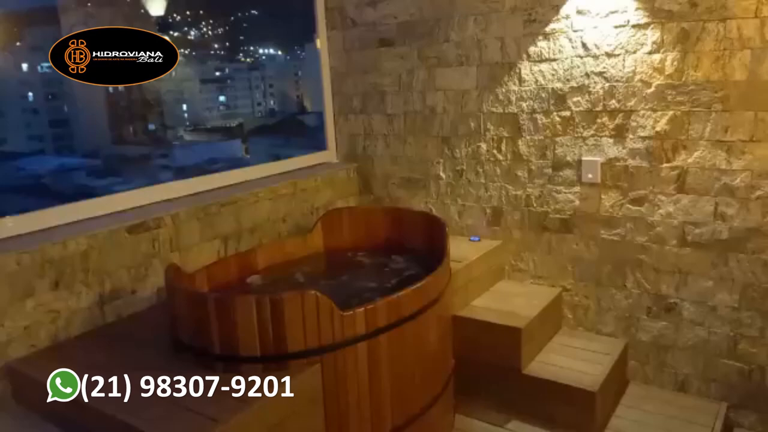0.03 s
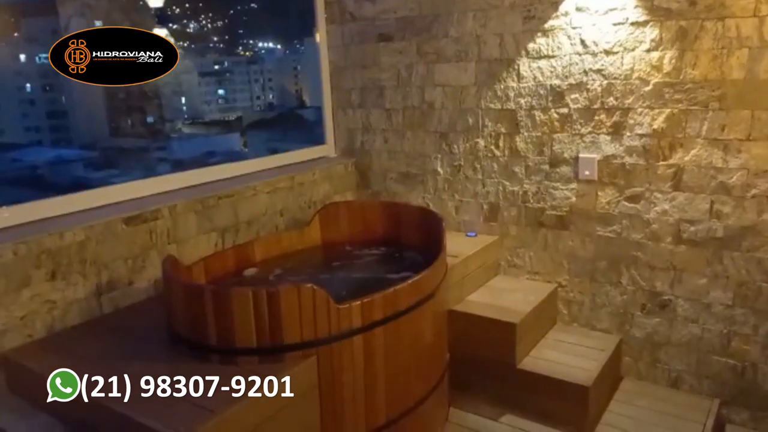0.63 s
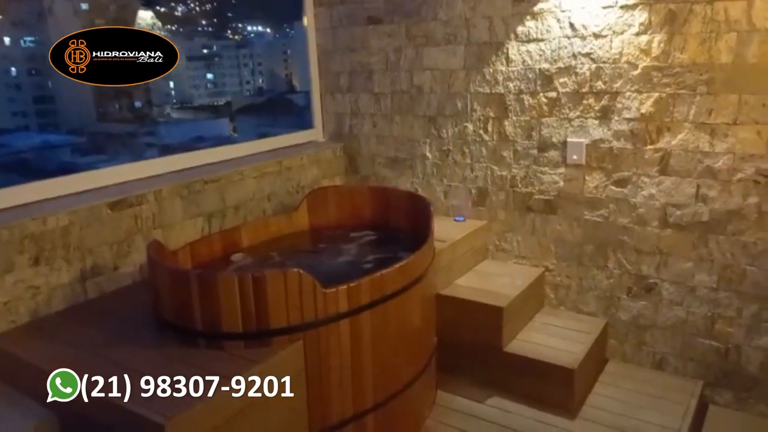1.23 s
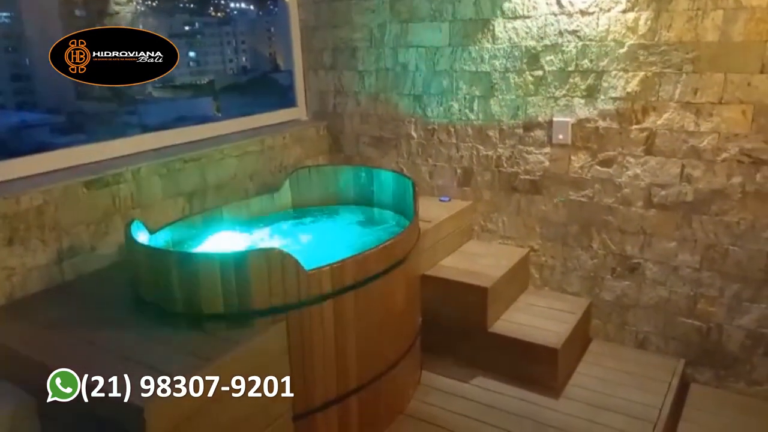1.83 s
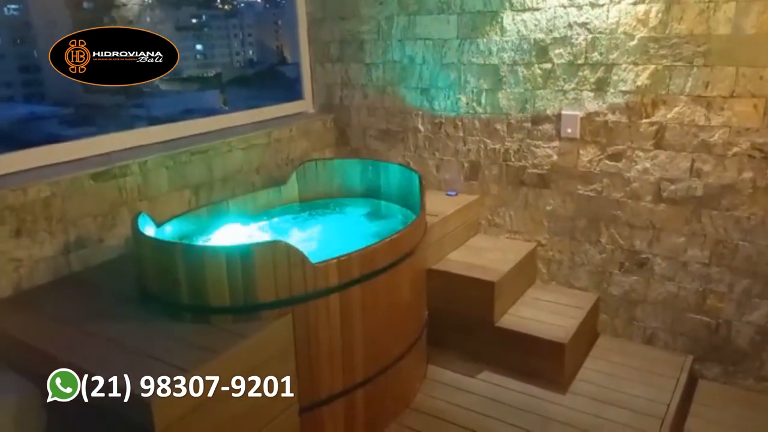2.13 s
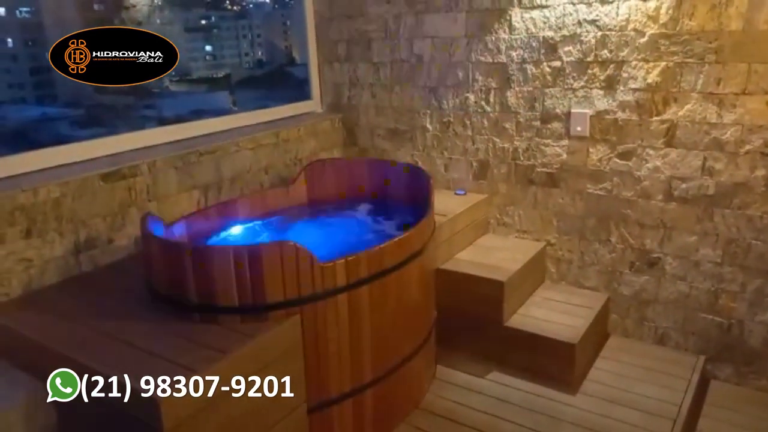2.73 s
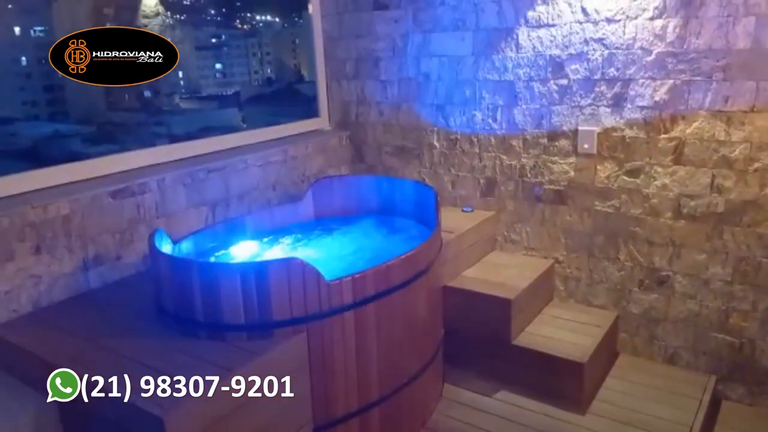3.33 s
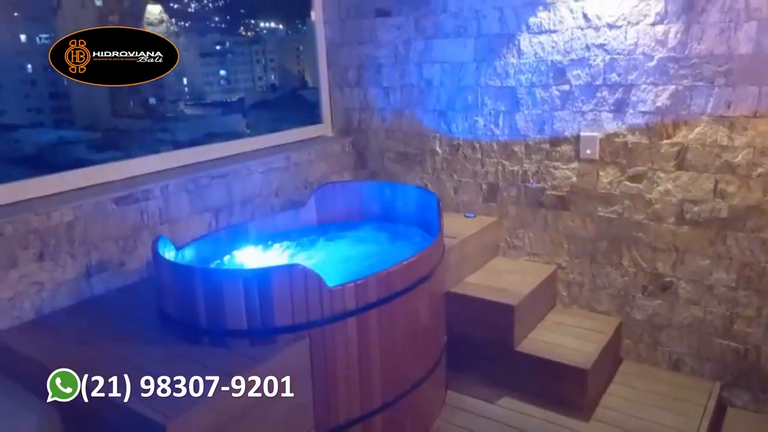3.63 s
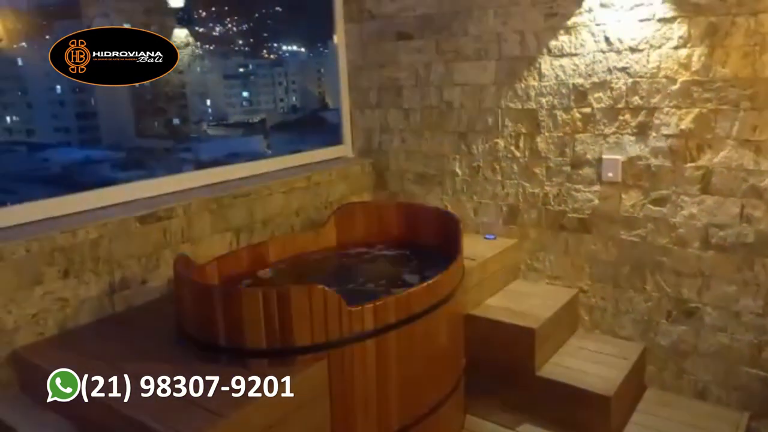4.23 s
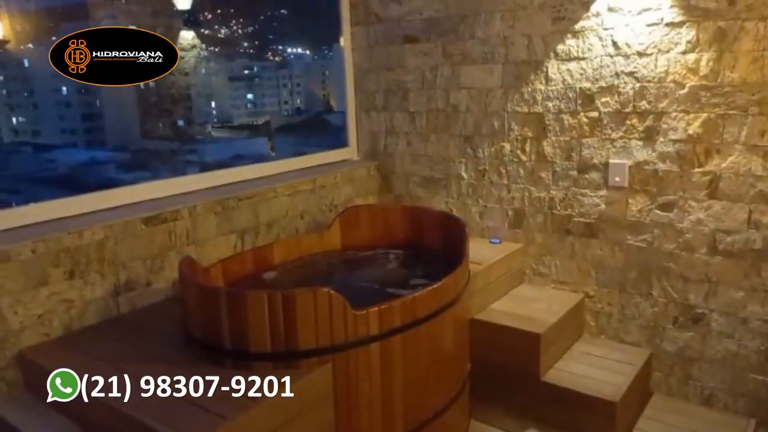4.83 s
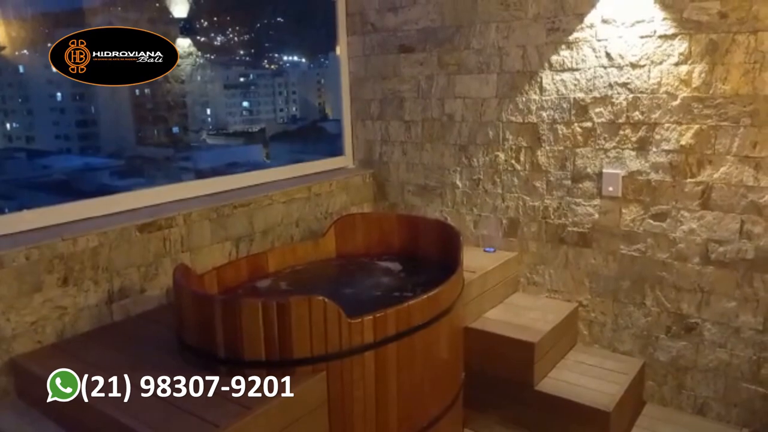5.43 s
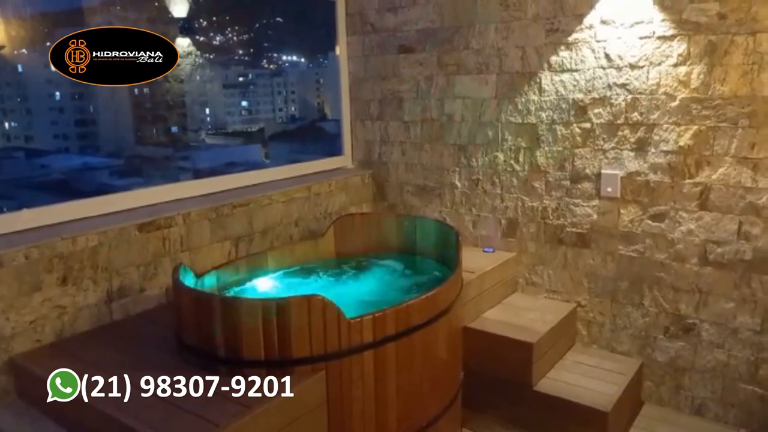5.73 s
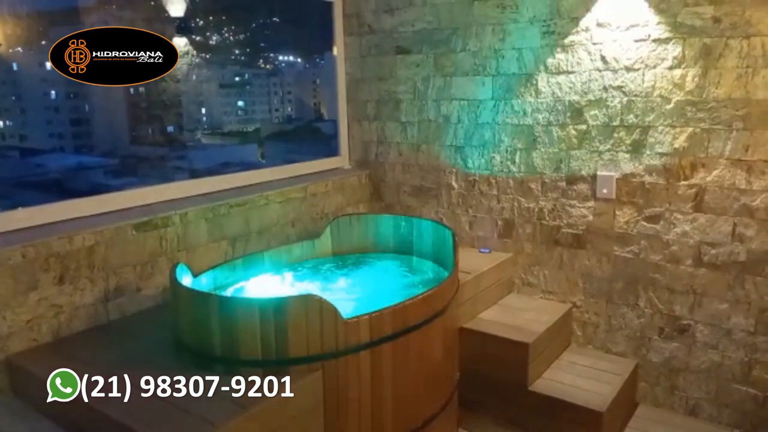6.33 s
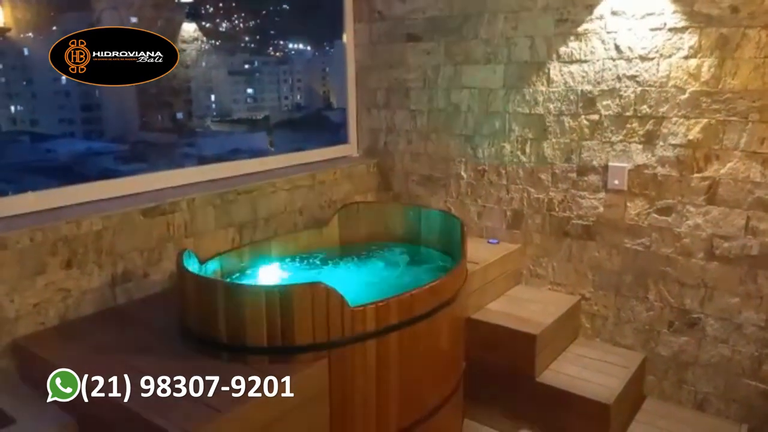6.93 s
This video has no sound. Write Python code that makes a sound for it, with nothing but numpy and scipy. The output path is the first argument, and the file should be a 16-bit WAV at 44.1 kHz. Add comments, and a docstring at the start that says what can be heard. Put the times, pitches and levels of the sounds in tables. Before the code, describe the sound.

A wooden hot tub bubbles continuously on a terrace, a mix of gurgling, fine splashing and fizzy hiss. A low wind thump hits the microphone at the start, then a louder run of buffets follows about a second in. The water softens briefly and comes back, while the wind eases to a light rumble with occasional bumps. The pump hums faintly underneath and the nozzles give a faint, wavering whistle.

```python
"""Stone-walled terrace, wooden hot tub. Jets churn the water: big bubbles gurgle, drops splash and
bursting foam fizzes, all dipping in level after the first second and recovering. Air drawn into the
nozzles rushes and whistles, the pump hums faintly and the hollow of the tub rings. A light draught
and puffs of wind buffet the two microphone ports, hardest around the first second."""
import sys
import numpy as np
from scipy import signal
from scipy.fft import rfft, irfft, next_fast_len
from scipy.io import wavfile
from scipy.ndimage import uniform_filter1d, map_coordinates

SR = 44100
rng = np.random.default_rng(int(sys.argv[2]) if len(sys.argv) > 2 else 0)


def persist_wave(psi):
    """Save psi, clipped to +-1, as 16-bit WAV."""
    counts = np.round(np.clip(psi, -1, 1) * 32767).astype(np.int16)
    wavfile.write(sys.argv[1], SR, np.atleast_2d(counts).T)


N = 307818
TIME_S = np.arange(N) / SR


def amp(db):
    """Decibels to gain."""
    return 10 ** (np.asarray(db) / 20)


def unit(x):
    """Scale to rms 1."""
    return x / np.sqrt(np.mean(x ** 2) + 1e-20)


def pan(pan_db):
    """Port gains for a left-minus-right level."""
    return amp(np.array([[.5], [-.5]]) * pan_db)


def at_freq(points, hz):
    """Interpolate (freq_hz, value) rows on a log axis."""
    freq_hz, values = np.transpose(points)
    return np.interp(np.log(hz + 1), np.log(freq_hz + 1), values)


def over_time(points):
    """Interpolate (time_s, value) rows per sample."""
    return np.interp(TIME_S, *np.transpose(points))


def wobble(rate_hz):
    """Smooth random curve with knots at rate_hz."""
    knots = rng.standard_normal(int(N * rate_hz / SR) + 4)
    return map_coordinates(knots, [TIME_S * rate_hz])


def filtered(x, response):
    """Apply a gain given as a function of frequency."""
    size = next_fast_len(N + SR // 2)
    return irfft(rfft(x, size) * response(np.fft.rfftfreq(size, 1 / SR)), size)[..., :N]


def resonance(hz, centre_hz, width_hz):
    """Bell curve of height 1."""
    return 1 / (1 + (2 * (hz - centre_hz) / width_hz) ** 2)


def narrow_hiss(centre_hz, width_hz, shared):
    """Noise through one resonance, partly common to both ports."""
    noise = rng.standard_normal((2, N)) + shared * rng.standard_normal(N)
    return unit(filtered(noise, lambda hz: resonance(hz, centre_hz, width_hz)))


def turbulence(spectrum, shared):
    """Coloured noise of even strength, partly common to both ports."""
    white = rng.standard_normal((2, N)) + shared * rng.standard_normal(N)
    noise = unit(filtered(white, lambda hz: amp(at_freq(spectrum, hz))))
    power = uniform_filter1d(uniform_filter1d(noise ** 2, size=900), size=900)
    return noise / np.sqrt(np.abs(power) + 0.021)


def bubbles(per_s, lo_hz, hi_hz, cycles, spread_db, samples):
    """Random bubbles: damped sines rising in pitch, a few much louder than the rest."""
    when, pitch, loud, life = rng.random((int(per_s * N / SR), 4)).T[:, :, None]
    pitch_hz = lo_hz * (hi_hz / lo_hz) ** pitch
    turns = pitch_hz * np.arange(samples) / SR
    age = turns / (cycles * (.5 + life))
    strength = amp(-spread_db * np.log(1 - .985 * loud)) * pitch_hz
    rise = 1 + 0.027 * np.minimum(age, 5)
    ring = strength * np.exp(-age) * np.sin(2 * np.pi * turns * rise)
    index = (when * N).astype(int) + np.arange(samples)
    return unit(np.bincount(index.ravel(), ring.ravel(), N + samples)[:N])


def terrace(x, t60_s, wet_db):
    """Direct sound plus a diffuse wash of reflections, renewed often so that no pitch rings out."""
    hop = SR // 6
    tail_s = np.arange(SR // 4) / SR
    frames = np.lib.stride_tricks.sliding_window_view(np.pad(x, (hop, 2 * hop)), 2 * hop)[::hop]
    frames = frames * np.hanning(2 * hop) ** .5
    responses = rng.standard_normal((len(frames), 2, len(tail_s))) * amp(-60 * tail_s / t60_s)
    responses *= amp(wet_db) / np.linalg.norm(responses, axis=2, keepdims=True)
    responses[:, 0, 6] += 1
    responses[:, 1, 0] += 1  # direct sound reaches the right port first
    out = np.zeros((2, N + SR))
    for k, echo in enumerate(signal.fftconvolve(frames[:, None], responses, axes=2)):
        out[:, k * hop:][:, :echo.shape[1]] += echo
    return unit(out[:, hop:hop + N])


def near_walls(x, echo_db):
    """Direct sound plus eight weak echoes per port from the nearest walls."""
    delays_s = rng.uniform(.002, .03, (2, 8))
    taps = np.zeros((2, SR // 30))
    taps[:, 0] = 1
    taps[[[0], [1]], (delays_s * SR).astype(int)] = amp(echo_db)
    return unit(signal.fftconvolve(x, taps, axes=1)[:, :N])


# Modes of the tub and fittings: centre_hz, width_hz, boost_db
TUB_MODES = [(365.3, 31, 6), (462, 45, 2), (742, 19, 3), (890, 26, 2.5), (1770, 55, -1), (2025, 260, 5),
             (2460, 60, 0.5), (2864, 50, 4), (3280, 59, 3), (3460, 130, 5), (4290, 90, 4.5),
             (4570, 124, 4.5), (4840, 120, 3), (11600, 80, 4), (12200, 120, 2.5), (12400, 80, 3)]
# Left-right likeness of the water: freq_hz, correlation
WATER_CORRELATION = [(100, 1), (300, 0.76), (700, 0.3), (1250, -0.51), (2000, 0.18), (5500, -0.088),
                     (15000, -0.071)]

def water_layer(grains, spectrum, wash_db, surge_db):
    """Bubbles over a wash of countless smaller ones, coloured by the tub; bass alike at both ports."""
    def mid_side_gains(hz):
        modes_db = sum(db * resonance(hz, centre_hz, width_hz) for centre_hz, width_hz, db in TUB_MODES)
        angle = np.arccos(np.clip(at_freq(WATER_CORRELATION, hz), -1, 1)) / 2
        return amp(at_freq(spectrum, hz) + modes_db) * [np.cos(angle), np.sin(angle)]

    left, right = grains + amp(wash_db) * rng.standard_normal((2, N))
    mid, side = filtered(np.array([left + right, left - right]), mid_side_gains)
    return unit(np.array([mid + side, mid - side]) * amp(surge_db))


# Loudness of the water, dips after the big gust, then recovers: time_s, level_db
WATER_LEVEL = [(0.15, -48), (0.6, -48), (0.92, -46.5), (1.03, -49), (1.22, -55), (1.99, -54.5),
               (2.27, -57.5), (2.8, -52), (3.6, -50), (3.95, -51), (5.05, -49.5), (6.95, -51)]

def follow_water(usual_db, db_per_db):
    """Gain of a layer that follows the water's loudness; usual_db at a water level of -50.5 dB."""
    return amp(usual_db + db_per_db * (over_time(WATER_LEVEL) + 50.5))


# Big-bubble spectrum: freq_hz, level_db
GURGLE_SPECTRUM = [(70, -18), (170, -10), (250, -2), (340, -3), (430, -4.5), (540, -7.5), (650, -3),
                   (760, -10.5), (920, -6.5), (1060, -8.5), (1250, -17.5), (2200, -24)]
# Big-bubble envelope: time_s, level_db
GURGLE_LEVEL = [(0.15, -43), (0.9, -43.5), (1.4, -48), (2.25, -50.5), (2.9, -44.5), (3.6, -45), (4.3, -46),
                (4.85, -44.5), (5.0, -42), (5.2, -45), (5.45, -45), (5.68, -42), (6.05, -45.5),
                (6.95, -44.5)]

def gurgle(heave):
    """Big bubbles from the jets ring low."""
    big = bubbles(per_s=800, lo_hz=201.3, hi_hz=1285, cycles=3.37, spread_db=2.5, samples=1200)
    big = terrace(big, t60_s=0.15, wet_db=1)
    surge_db = 0.31 * heave + 0.18 * wobble(55)
    return amp(over_time(GURGLE_LEVEL)) * water_layer(big, GURGLE_SPECTRUM, wash_db=8, surge_db=surge_db)


# Falling-drop spectrum: freq_hz, level_db
SPLASH_SPECTRUM = [(600, -21.5), (1050, 0), (1350, -4), (1700, -2.5), (2100, -4), (2600, -4), (3200, -9),
                   (3750, -10.5), (4100, -7.5), (4750, -8.5), (5400, -11), (8000, -18)]

def splash(heave):
    """Drops fall back onto the heaving surface."""
    drops = bubbles(per_s=1800, lo_hz=1096, hi_hz=5680, cycles=2.97, spread_db=3.5, samples=400)
    drops = terrace(drops, t60_s=0.12, wet_db=6.5)
    water = water_layer(drops, SPLASH_SPECTRUM, wash_db=3.5, surge_db=0.56 * heave + 0.84 * wobble(50))
    return follow_water(usual_db=-47.5, db_per_db=0.9) * near_walls(water, echo_db=-21.5)


# Bursting-foam spectrum: freq_hz, level_db
FIZZ_SPECTRUM = [(3000, -29), (5400, -10), (7000, -2.5), (8400, -5), (9400, 1), (10600, 1), (11400, 0.5),
                 (12600, 0.5), (14000, -2), (15700, -1.5)]

def fizz(heave):
    """Tiny foam bubbles burst in spurts."""
    foam = bubbles(per_s=1500, lo_hz=4350, hi_hz=16050, cycles=2.6, spread_db=4, samples=100)
    foam = terrace(foam, t60_s=0.067, wet_db=18)
    spurts_db = .4 * wobble(7) + .5 * wobble(25) + .45 * wobble(70)
    water = water_layer(foam, FIZZ_SPECTRUM, wash_db=3, surge_db=0.12 * heave + spurts_db)
    return follow_water(usual_db=-49, db_per_db=0.98) * near_walls(water, echo_db=-23) * pan(0.8)


# Nozzle whistle bands: centre_hz, width_hz, relative_db
WHISTLE_BANDS = [(9890, 100, -4), (10090, 250, -3), (11470, 220, -9.5), (11300, 110, -15)]
# Whistle envelope: time_s, level_db
WHISTLE_LEVEL = [(0.1, -63), (1.2, -61.5), (1.55, -59.5), (1.95, -61), (2.3, -65), (2.9, -61.5), (3.6, -60),
                 (4.6, -62.3), (6.95, -61.5)]
# Thin tones in the air rush: centre_hz, width_hz, relative_db
RUSH_TONES = [(1012, 13, -5), (1702, 14, -5.5), (2024, 75, -10), (2410, 14, -10.5)]

def nozzles():
    """Air drawn into the jets: a wavering whistle, an even sizzle and, when loudest, a singing rush."""
    whistle = sum(amp(db + 1.8 * wobble(9)) * narrow_hiss(hz, width_hz, shared=1.1)
                  for hz, width_hz, db in WHISTLE_BANDS)
    whistle_db = over_time(WHISTLE_LEVEL) + 1.4 * wobble(13)
    rush = amp(1.5 * wobble(6.7)) * narrow_hiss(centre_hz=1757, width_hz=190, shared=0.53)
    tones = sum(amp(db) * narrow_hiss(hz, width_hz, shared=0.32) for hz, width_hz, db in RUSH_TONES)
    sizzle = narrow_hiss(centre_hz=4044, width_hz=140, shared=1)
    return (amp(whistle_db) * whistle
            + follow_water(usual_db=-60.5, db_per_db=1.95) * (rush + tones)
            + follow_water(usual_db=-64, db_per_db=1) * sizzle)


# Mains and impeller tones: pitch_hz, level_db
PUMP_TONES = [(120, -63), (685, -68), (1027, -67), (1146, -81)]

def pump():
    """Mains hum and impeller tones, unsteady as air passes through the pump."""
    clock_s = np.cumsum(1 + .003 * wobble(25)) / SR
    out = np.zeros((2, N))
    for pitch_hz, level_db in PUMP_TONES:
        peak = np.sqrt(2) * amp(level_db + 3.6 * wobble(22))
        port_turns = 0.22 * rng.random((2, 1))
        out += peak * np.sin(2 * np.pi * (pitch_hz * clock_s + port_turns))
    return out


# Draught envelope: time_s, level_db
DRAUGHT_LEVEL = [(0.1, -34), (0.4, -41), (0.55, -45.5), (0.9, -37), (1.6, -39.5), (1.76, -41.5), (2.0, -45),
                 (2.15, -56), (2.43, -56.5), (2.6, -45.5), (2.95, -43), (3.45, -51), (3.68, -44),
                 (3.85, -52), (4.24, -48), (4.37, -57), (4.6, -49.5), (5.25, -50), (5.8, -44.5), (6.3, -50),
                 (6.46, -55), (6.78, -43.5), (6.95, -61)]
# Draught spectrum: freq_hz, level_db
DRAUGHT_SPECTRUM = [(15, -33), (35, -19), (58, -0.5), (85, 2), (125, -6), (170, -15.5), (300, -17),
                    (600, -63)]

def draught():
    """A light draught rumbles on each port in random lumps."""
    lumps_db = 5.5 * np.minimum([wobble(20), wobble(20)], 1)
    return amp(over_time(DRAUGHT_LEVEL) + lumps_db) * pan(-2) * turbulence(DRAUGHT_SPECTRUM, shared=0.76)


# Wind puffs: centre_s, half_length_s, strength_db, pan_db, extra_eddies_db
PUFFS = [(0.082, 0.014, -27.5, -10, 4.5), (0.103, 0.014, -31, 14, 7), (0.2, 0.026, -36.5, -11, -11),
         (0.375, .014, -42, -2, -4), (0.685, 0.012, -38.5, 18, 1), (0.787, 0.019, -28, -18, 0.5),
         (0.832, 0.019, -32.5, -22, -5), (0.934, 0.032, -25, -21.5, -6.5),
         (0.998, 0.017, -16.5, -10.5, 0.5), (1.04, .014, -20, -17, 1.5), (1.09, 0.022, -21, -4.5, 3.5),
         (1.136, 0.019, -18, -9.5, -1), (1.195, 0.018, -18.5, -0.5, 2), (1.305, 0.016, -19, -1.5, 3),
         (1.348, 0.0094, -29, 7.5, 4), (1.43, 0.02, -20.5, 2, -2), (1.523, 0.0093, -26, -4, 3),
         (1.577, 0.029, -25.5, 0.5, 2), (1.627, 0.0093, -24.5, -2, 1.5), (1.653, 0.014, -26.5, -2, 2),
         (1.703, 0.0096, -27.5, -1.5, 11.5), (1.869, 0.013, -24.5, 4.5, -5), (1.924, 0.0075, -39, -5, -3),
         (2.33, 0.013, -39, 1, 6), (2.877, 0.01, -42, 11, -1), (2.935, 0.0061, -32, -5, 0),
         (2.972, 0.011, -30.5, -6.5, 0), (3.048, 0.018, -40, 17.5, 4), (3.981, 0.024, -32.5, -7, 6),
         (4.072, 0.015, -34, -10, -14), (4.265, 0.014, -40, -4, -10), (4.602, 0.011, -28, 3, -12),
         (4.649, 0.0083, -32, 0, 2), (4.71, 0.018, -44, 19, 3), (4.96, 0.016, -42.5, -15, 0),
         (5.035, 0.011, -38.5, 5, 2), (5.144, 0.027, -36.5, 1, -6), (5.72, 0.012, -34, -7, -6),
         (5.782, 0.015, -34, -4, 0), (6.792, 0.025, -39.5, 0, 3)]
# Puff thud spectrum: freq_hz, level_db
THUD_SPECTRUM = [(15, -50), (40, -11), (70, 5.5), (100, 6.5), (155, -6), (220, -16.5), (400, -33),
                 (900, -79)]
# Small-eddy spectrum: freq_hz, level_db
EDDY_SPECTRUM = [(60, -5.5), (140, 3.5), (220, -1), (330, -8.5), (450, -17), (650, -27), (1200, -44),
                 (3000, -61)]

def puffs():
    """Each puff thuds on the ports; the stronger it is, the more small eddies brighten it."""
    thud_power, eddy_power = np.zeros((2, 2, N))
    for centre_s, half_s, strength_db, pan_db, eddies_db in PUFFS:
        near = np.abs(TIME_S - centre_s) < 4 * half_s
        swell = np.exp(-.5 * ((TIME_S[near] - centre_s) / half_s) ** 2)
        strength = amp(strength_db) * pan(pan_db) * swell
        thud_power[:, near] += (amp(-5) * strength ** 0.89) ** 2
        eddy_power[:, near] += (amp(5.5 + eddies_db) * strength ** 1.544) ** 2
    thuds = np.sqrt(thud_power) * turbulence(THUD_SPECTRUM, shared=0.36)
    eddies = np.sqrt(eddy_power) * turbulence(EDDY_SPECTRUM, shared=0.25)
    return thuds + eddies


# Single pushes of air: centre_s, peak_db, pitch_hz, pan_db
THUMPS = [(0.083, -16, 140, -22), (1.187, -11, 115, -3), (1.298, -14.5, 110, -1), (1.624, -16, 135, 1),
          (2.321, -29.5, 105, 0), (2.926, -25.5, 80, -2), (3.98, -22.5, 95, 1), (3.997, -26.5, 105, -9),
          (5.71, -28.5, 100, -9)]

def thumps():
    """A big eddy passes the ports: one low push of about a cycle, no ring."""
    port_lags_s = 0.00091 * rng.uniform(-1.26, 1, (len(THUMPS), 2, 1))
    out = np.zeros((2, N))
    for (centre_s, peak_db, pitch_hz, pan_db), lag_s in zip(THUMPS, port_lags_s):
        near = np.abs(TIME_S - centre_s) < .03
        phase = np.pi * pitch_hz * (TIME_S[near] - centre_s - lag_s)
        push = (2 * phase ** 2 - 1) * np.exp(-phase ** 2)
        out[:, near] += amp(peak_db) * pan(pan_db) * push
    return out


# Envelope of the tub's hollow ring: time_s, level_db
HOLLOW_LEVEL = [(0.9, -72), (1.8, -58.5), (2.3, -61), (3.0, -58), (4.4, -54.5), (6.95, -57)]

def hollow():
    """Water keeps the hollow of the tub ringing, clearer later on."""
    return amp(over_time(HOLLOW_LEVEL)) * narrow_hiss(centre_hz=611.4, width_hz=41, shared=1)


def scene():
    """Three water layers on one heaving surface, plus nozzles, pump, wind and tub ring."""
    heave = wobble(14)
    water = gurgle(heave) + splash(heave) + fizz(heave)
    return water + nozzles() + pump() + draught() + puffs() + thumps() + hollow()


def record(dry):
    """Sound sets in after a moment; the hardest thuds are rounded off and the top treble is cut."""
    start_s, fade_s, ceiling, top_hz = .069, .002, .6, 15760
    fade_in = np.clip((TIME_S - start_s) / fade_s, 0, 1)
    rounded = dry / (1 + (dry / ceiling) ** 4) ** .25
    return filtered(rounded * fade_in, lambda hz: hz < top_hz)


dry = scene()
out = record(dry)
persist_wave(out)
```